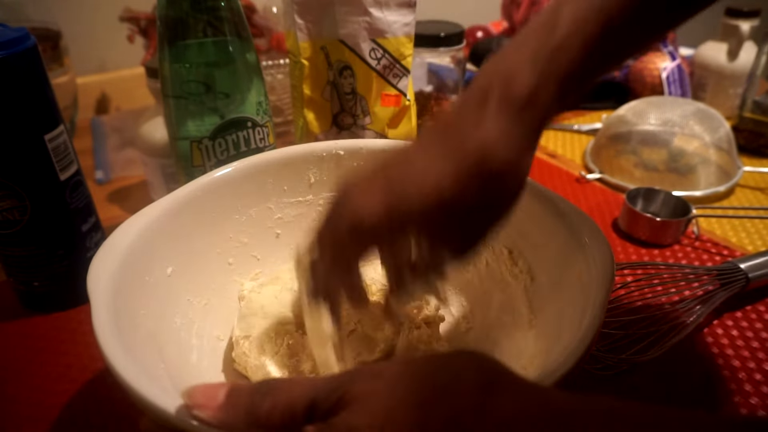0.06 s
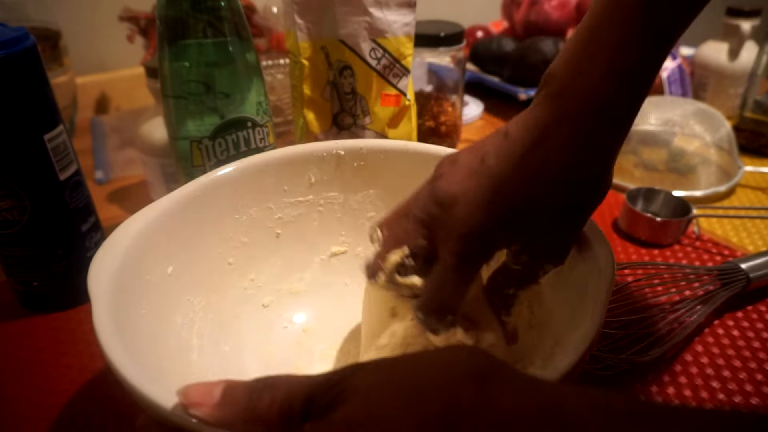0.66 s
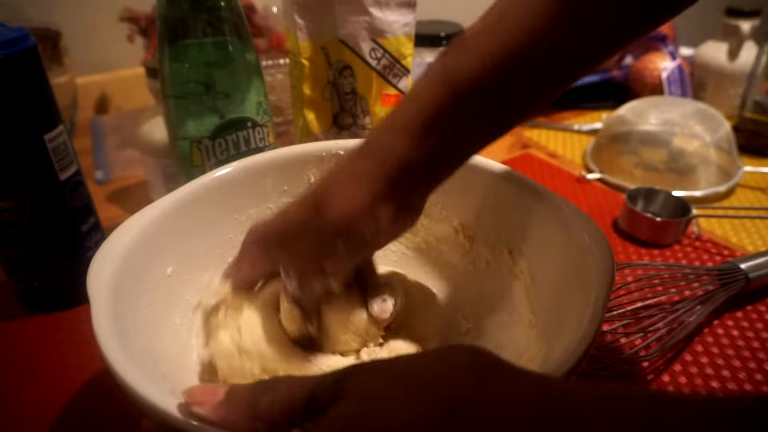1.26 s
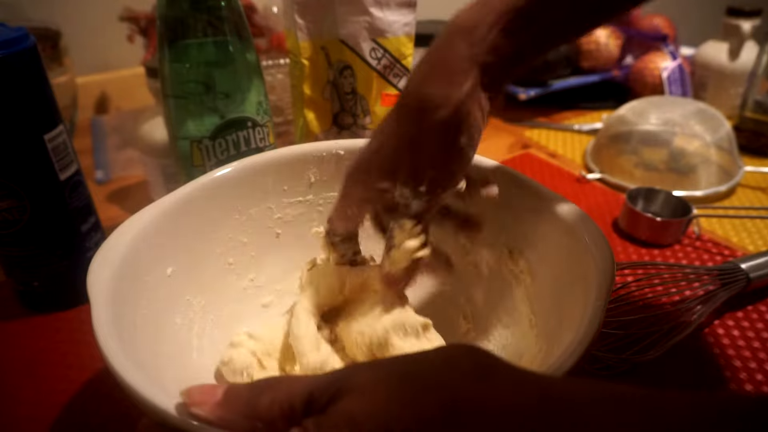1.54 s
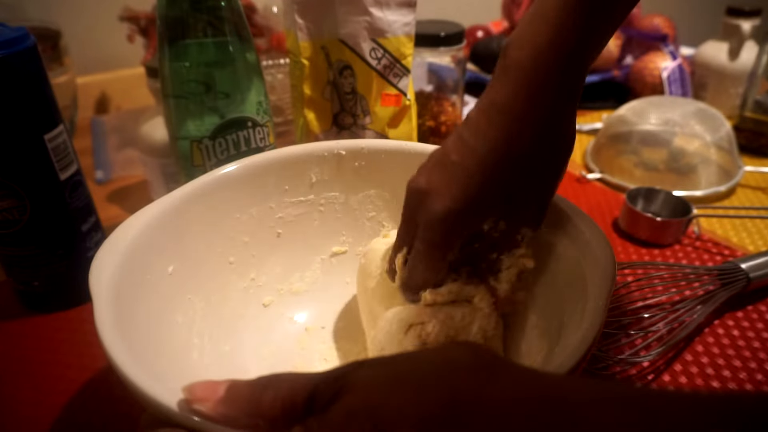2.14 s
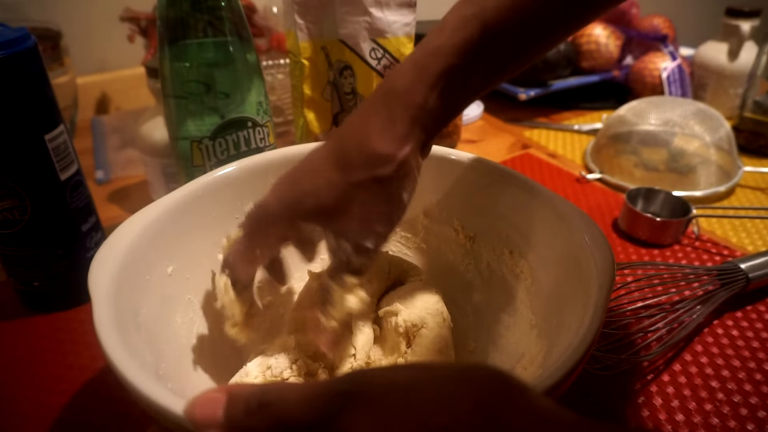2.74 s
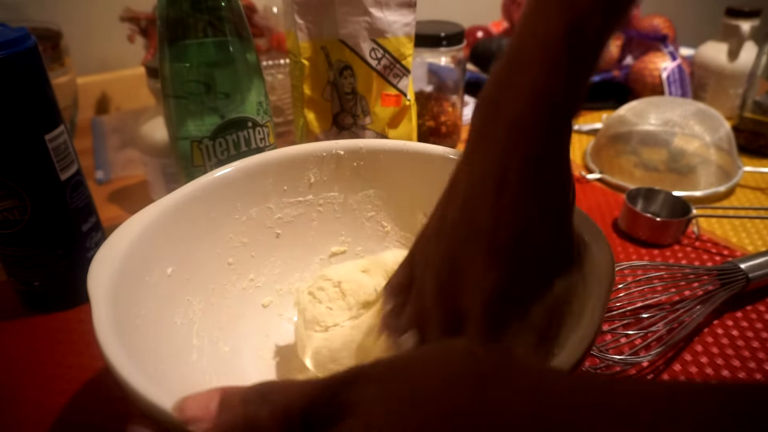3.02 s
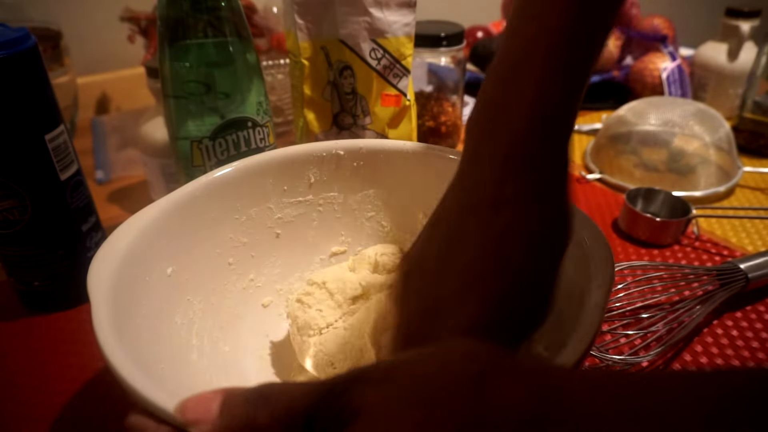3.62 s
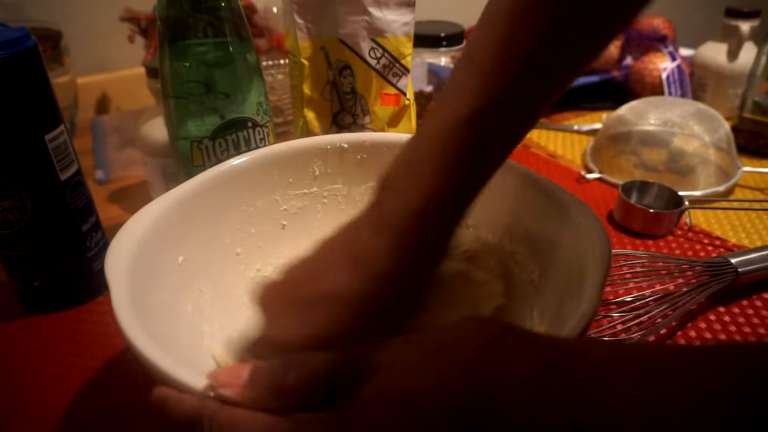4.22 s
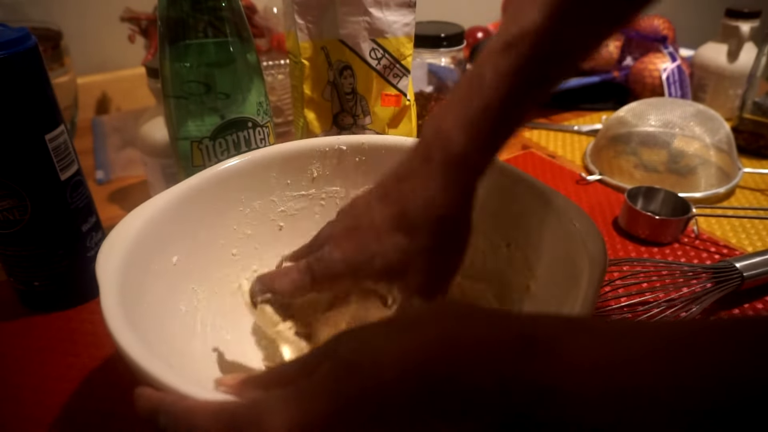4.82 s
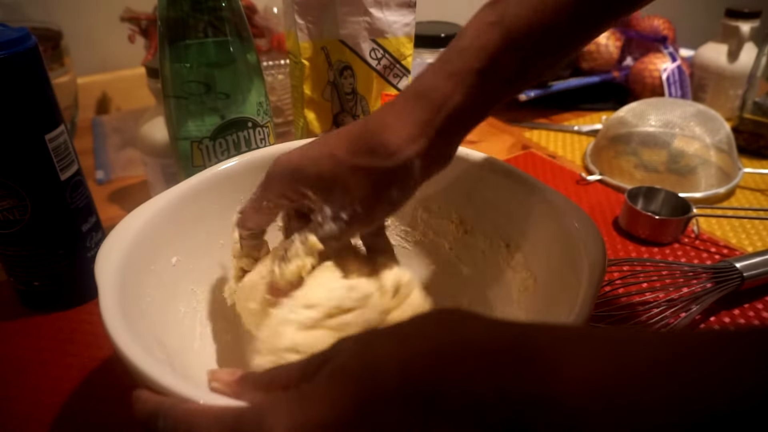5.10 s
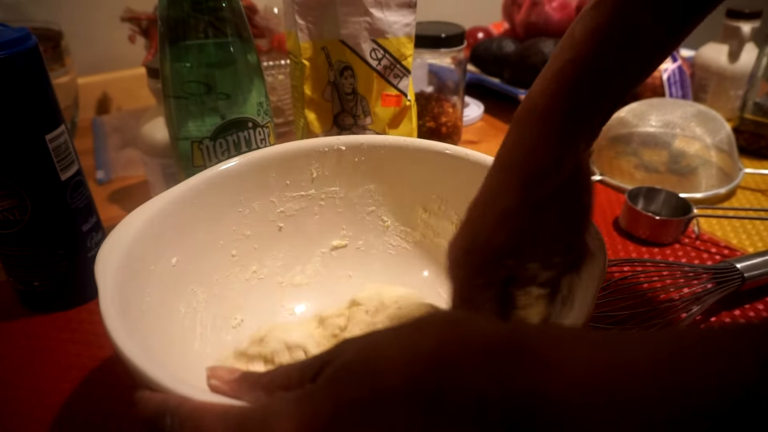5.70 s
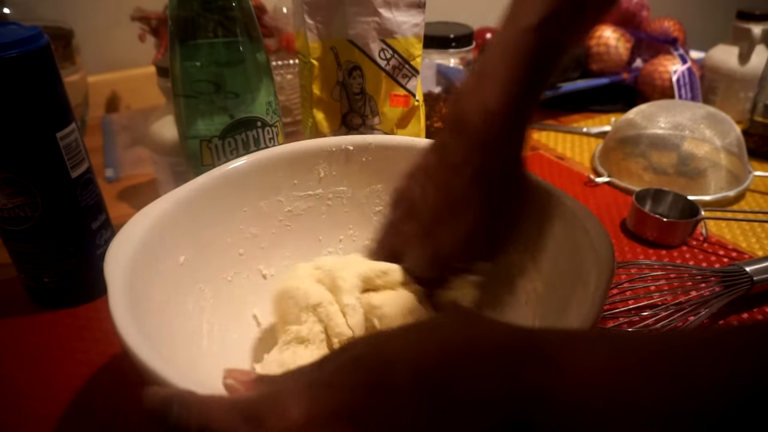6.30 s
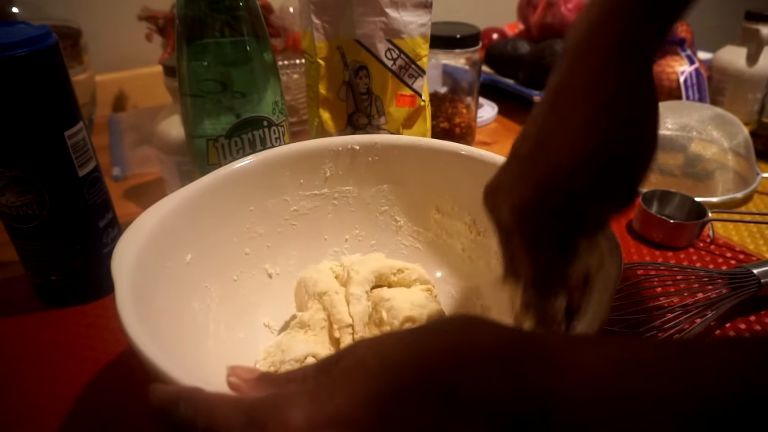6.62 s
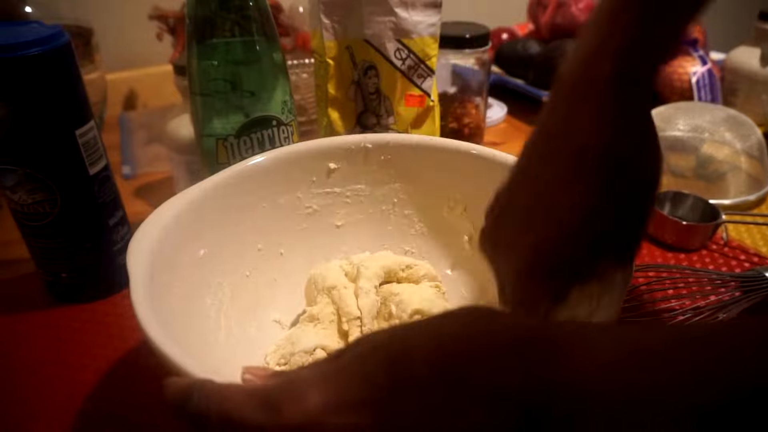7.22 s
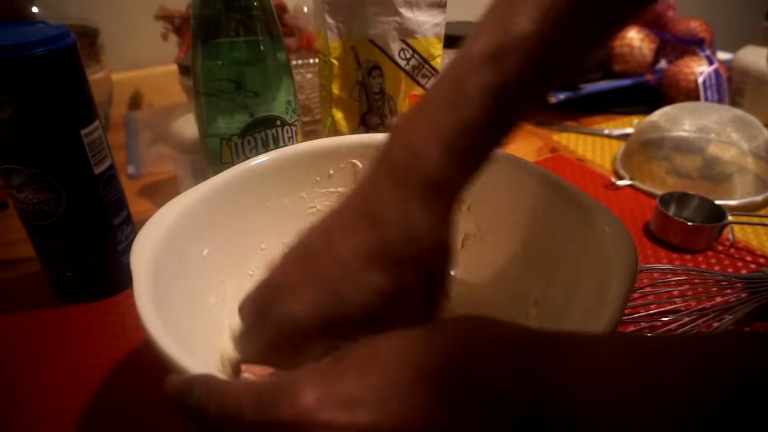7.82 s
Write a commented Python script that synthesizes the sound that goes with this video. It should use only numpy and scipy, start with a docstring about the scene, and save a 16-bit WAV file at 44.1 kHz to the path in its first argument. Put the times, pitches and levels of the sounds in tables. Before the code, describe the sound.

A hand kneads stiff dough in a large mixing bowl on a kitchen table, heard close and slightly to the right. At the very start the bowl knocks on the table, and a bright hiss dies away into a thin, faint whistle within half a second. Further pushes rock the bowl at about 1.1, 2.4, 2.8, 4, 4.9, 5.3, 6.1 and 7.1 seconds. Each gives a hollow knock with a soft low thud and a short ring in the room; the loudest comes near 4 seconds. Between them are lighter bumps, quiet swishes of a floury hand round the bowl wall, dull rustling of dough and scattered sticky ticks. Faint thin squeaks appear around 0.8 and 4.5 seconds. A last few ticks come at about 7.6 seconds. An appliance hums and whines faintly in the background throughout.

```python
"""Kitchen table: a hand kneads stiff dough in a large mixing bowl, the right microphone the nearer of a pair.
The first push knocks the bowl on the table, and a bright hiss dies away into a thin whistle. About once a
second another push rocks the bowl and the knock rings on in the room, loudest near 4 s. Between pushes
the floury hand rubs round the wall, the dough rustles and sticky bits tick, with a last few ticks at
the end. An appliance hums and whines faintly in the background throughout."""
import sys
import numpy as np
from scipy import signal
from scipy.fft import rfft, irfft, next_fast_len
from scipy.io import wavfile

SR = 44100
rng = np.random.default_rng(int(sys.argv[2]) if len(sys.argv) > 2 else 0)


def waveform_to_disk(signal):
    """Save audio, clipped to [-1, 1], as 16-bit WAV at the path in sys.argv[1]."""
    frames = np.transpose(np.atleast_2d(signal))
    scaled = np.clip(frames, -1, 1) * 32767
    samples = np.round(scaled).astype(np.int16)
    wavfile.write(sys.argv[1], SR, samples)


N = 346225

# bowl meets table: (time [s], level [dB], hardness [factor on contact bandwidth],
# weight behind the push [dB], ring that the hands leave undamped [dB])
KNOCKS = [(0.0651, -15.5, 0.93, -20, -.5), (1.0564, -16.5, 0.96, -16, 1), (1.532, -31, 0.92, 3, 2),
          (1.761, -30.5, 0.67, -23, 5), (2.399, -11.5, 1.21, -16, 0), (2.8474, -10.5, 1.205, -10, 1),
          (3.411, -23.5, 0.52, 0, -14), (3.4194, -23, 0.75, -11, 2.5), (4.038, -10.5, 0.52, 3, -15),
          (4.0496, -8.5, 1.096, -2.5, 3), (4.43, -32.5, 0.71, 5, 0), (4.511, -28.5, 0.56, 6.5, 7),
          (4.9466, -15.5, 0.78, -28, -1.5), (5.211, -36.5, 0.83, 4, 5.5), (5.2996, -14.5, 0.6, 0.5, -1),
          (5.3251, -13.5, 0.92, -6.5, -0.5), (6.1436, -15.5, 0.84, -13.5, 0), (7.095, -29, 1.08, 4, -1),
          (7.1061, -12, 0.72, -9, 0), (7.282, -34, 0.65, -2, 8), (7.521, -28.5, 0.73, -19, 2)]
# ring of bowl and table: (frequency [Hz], gain [dB], t60 [s])
BOWL_MODES = [(232.5, -7, 0.19), (249, -43, 0.56), (320, 8.5, 0.36), (341, 12, 0.89), (356, 4, 0.75),
              (437, -9.5, 0.12), (521.5, 1, 0.22), (573, 6, 0.42), (639, -4.5, 0.72), (687, 11.5, 0.45),
              (810, -19, 0.75), (905, 6, 0.8), (1008, -10, 0.46), (1069, 13.5, 0.25), (1214, 11, 0.24),
              (1257, -12, 0.59), (1354, 12, 0.12), (1460, 13.5, 0.23)]
# a knock's short waves favour the nearer microphone: (frequency [Hz], right minus left [dB])
KNOCK_BALANCE = [(280, 0.5), (480, 1.5), (900, 6), (2000, 3.5)]
# the hand sweeps round the wall: (start [s], length [s], level [dB], extra rasp from pressure [dB],
# swell over the stroke [dB])
STROKES = [(0, 0.07, -55.5, 4.5, 2), (0.668, .18, -65, 5, 6), (1.236, 0.25, -70.5, 4, -5),
           (1.522, .04, -57.5, -2.5, -4), (1.847, 0.088, -68, 6, -2), (2.402, .04, -71.5, 11, -1),
           (2.593, 0.063, -66, 4, -4), (2.77, 0.32, -66.5, 12.5, 7), (2.954, 0.15, -48.5, 3.5, 2),
           (3.255, 0.13, -58.5, -2, -11), (3.418, .11, -52.5, 0.5, -2), (3.67, 0.038, -50.5, -2, -1.5),
           (3.745, 0.082, -58.5, -4, 4), (3.888, .14, -52.5, -3.5, 7.5), (4.047, .16, -57, 6, -8.5),
           (4.247, .11, -65.5, 0, -5), (4.389, 0.17, -54, -0.5, -1.5), (4.57, 0.28, -72, 12, 7.5),
           (5.19, 0.13, -68.5, 9, 2), (5.556, 0.2, -61, 0.5, 5.5), (5.875, 0.079, -52, -4.5, -5),
           (5.952, 0.19, -60, 2, -3), (6.291, 0.14, -56.5, -2.5, 3.5), (6.449, 0.082, -51.5, -6.5, -1.5),
           (6.663, .25, -54, -5.5, 2.5), (7.098, .22, -48.5, -6, -7), (7.451, .13, -49, -5, -7.5),
           (7.64, 0.18, -68.5, 4, 1)]
# floury skin on the wall, light and pressed: (frequency [Hz], level [dB])
HISS_SPECTRUM = [(1470, -5), (2500, -9.5), (3310, -18), (3770, -5.5), (4650, -2.5), (6810, -0.5),
                 (9810, -1.5), (12600, -2.5), (16000, -7)]
RASP_SPECTRUM = [(500, 1.5), (800, 4.5), (1400, 5.5), (1800, -1.5), (2500, 1.5), (3500, -3), (5000, -6),
                 (8000, -24.5)]
# the wall rings faintly under the strokes: (frequency [Hz], t60 [s], gain [dB])
WALL_MODES = [(1680, .045, -3), (2010, .04, -5), (2480, .05, -1), (3790, .045, -4), (6980, .035, -3),
              (7440, .05, -3), (7850, .02, -6), (8600, .04, -8), (9640, .022, -2), (12300, .024, -1),
              (13900, .03, -6)]
# rustle of yielding dough: (frequency [Hz], level [dB])
DOUGH_SPECTRUM = [(90, -13), (170, -4.5), (240, 3), (330, -3.5), (520, -1.5), (750, -4), (1100, -31)]
# the loudest sticky bits let go: (time [s], peak [dB], pitch [Hz], t60 [s], band edge [factor on pitch])
TICKS = [(0.165, -40.5, 5500, .02, 1.25), (.293, -50.5, 2200, 0.034, 1.07),
         (1.53, -32.5, 1390, 0.037, 1.02), (2.265, -50.5, 2860, 0.028, 0.85),
         (2.647, -40.5, 2880, 0.011, 1.1), (2.763, -43, 4775, 0.022, 1.1),
         (2.7954, -27.5, 3400, 0.01, 1.13), (4.241, -32.5, 13800, .0094, 1.1),
         (4.3485, -40, 13900, .011, 1), (5.207, -44.5, 2900, 0.047, 1.15), (6.309, -40, 8400, 0.012, 1.7),
         (7.567, -33, 980, 0.021, 1.13), (7.6383, -27, 12800, 0.0079, 1.04),
         (7.753, -41.5, 5900, .012, 1.08)]
# the bright opening hiss: (frequency [Hz], level [dB])
GUSH_SPECTRUM = [(760, -53), (1300, -29), (1680, -36), (1970, -13), (4650, -15), (4950, -14), (5610, -5),
                 (7420, -4.5), (7980, -1.5), (9520, -1), (10800, -11), (11700, -4), (15500, -20)]
# narrow tones that ring in that hiss: (frequency [Hz], t60 [s], gain [dB])
GUSH_TONES = [(2020, 0.13, 3), (4120, .15, 3), (5560, .08, 2), (8100, .06, 0), (11290, 0.11, 15),
              (11800, .12, -3)]
# the thin whistle it leaves: (time [s], pitch [Hz], level [dB])
WHISTLE = [(.12, 8120, -78), (.17, 8150, -67), (.21, 8160, -54), (.26, 7900, -85), (.31, 8260, -56),
           (.36, 8130, -61), (.43, 8150, -93)]
# thin squeaks: (start [s], length [s], pitch [Hz], ring time [s], level [dB])
SQUEAKS = [(.23, .1, 11260, 0.022, -69), (0.256, 0.035, 2440, 0.073, -58.5),
           (0.673, 0.33, 4550, 0.0014, -57.5), (0.842, 0.063, 8850, 0.0018, -55.5),
           (4.464, 0.37, 3410, 0.023, -58), (4.48, 0.33, 4870, 0.013, -65), (4.503, 0.21, 4000, .02, -64),
           (7.637, 0.05, 5400, .005, -54)]
# diffuse answer of the kitchen: (frequency [Hz], gain [dB])
ROOM_SPECTRUM = [(60, 15), (110, -5), (175, -13), (250, 0.5), (450, -3.5), (760, -2), (1150, 6),
                 (1600, 5.5), (2300, 8), (3200, -11), (5000, -20)]
# its decay: (frequency [Hz], t60 [s])
ROOM_T60 = [(100, 0.68), (300, 0.2), (1000, 0.45), (3000, 0.47)]
# the appliance's motor: (frequency [Hz], rms level [dB])
MOTOR_LINES = [(1121, -61.5), (1177, -69), (113.4, -66), (251, -62)]
# its rushing air: (frequency [Hz], level [dB])
AIR_SPECTRUM = [(15, -43), (25, -34), (59, -4.5), (166, -6.5), (236, 1.5), (285, -6), (335, -1), (575, -6),
                (911, -23), (1130, -19.5), (1260, -20.5), (1650, -21), (3520, -29), (11900, -62.5),
                (16000, -46)]
# likeness of diffuse sound at the two microphones: (frequency [Hz], correlation [0..1])
MIC_LIKENESS = [(25, .8), (130, .99), (280, .96), (550, .55), (1100, .35), (2500, .45), (12000, .42)]


def bowl(boom_hz=135.7, boom_t60=0.38, body_hz=101, body_t60=0.043, hollow_hz=172, hollow_t60=0.043):
    """Main source, on the table: each knock booms in the top and rings on in bowl and kitchen."""
    direct, to_table, to_modes = np.zeros((3, N))
    room = np.zeros((2, N))
    for s, level_db, hardness, weight_db, ring_db in KNOCKS:
        knock = from_db(level_db) * rocking(hardness)
        add(direct, s, knock)
        add(to_table, s, knock * from_db(weight_db))
        add(to_modes, s, knock * from_db(ring_db))
        add(room, s, kitchen(knock * from_db(ring_db)))   # the arm has moved, so the echoes are new
    boom = from_db(28.5) * resonate(to_table, boom_hz, boom_t60)
    body = from_db(8) * resonate(direct, body_hz, body_t60)
    ring = 0
    for k, (hz, db, t60) in enumerate(BOWL_MODES):
        strength = from_db(db + 2 * np.tanh(drift(2.04)))   # the dough shifts between pushes
        ring += (-1) ** k * resonate(strength * to_modes, hz, t60)
    sound = direct + boom + body + from_db(1) * ring + room
    sound -= resonate(sound, hollow_hz, hollow_t60)   # antiresonance between table and bowl
    size = next_fast_len(N)
    balance = pan(at_hz(KNOCK_BALANCE, np.fft.rfftfreq(size, 1 / SR)))
    return irfft(rfft(sound, size) * balance, size)[:, :N]


def rocking(hardness, gap_s=0.004815, gap_shrink=0.8625, softening=0.82, touches=4):
    """The bowl rocks to rest in ever quicker, duller touches; a harder push makes them brighter."""
    force, s = np.zeros(SR // 12), 0
    for k in range(touches):
        click = signal.unit_impulse(len(force), int(s * SR))
        bandwidth_hz = 687 * hardness * softening ** k
        force += from_db(30.5 + 0.25 * k) * cut(click, bandwidth_hz, "low", order=4)
        s += gap_s * gap_shrink ** k
    return -cut(force, 195, "high", order=3)   # the bowl radiates little bass


def dough_thuds(hz=90, t60=0.052, swell_s=0.0036):
    """With every knock the soft mass of dough lands in a few heavily damped low swings."""
    out, t = np.zeros(N), np.arange(SR // 3) / SR
    for s, level_db, _, weight_db, _ in KNOCKS:
        pitch = hz * (1 + rng.uniform(-0.16, 0.1))   # the lump has a new shape every time
        swing = np.sin(2 * np.pi * pitch * t) * decay(t, t60) * (1 - np.exp(-t / swell_s))
        peak_db = -31 + 0.35 * (level_db + weight_db)
        add(out, s, from_db(peak_db) * swing / np.abs(swing).max())
    return cut(out, 53, "high", order=3)


def hand(judder_db=1.73, judders_per_s=35, grips_per_s=9):
    """Inside the bowl, right of centre: floury skin grips unevenly, hisses, rasps and rings the wall."""
    hiss_gain, rasp_gain = stroke_gains()
    judder = from_db(judder_db * drift(judders_per_s))
    hiss = judder * from_db(3) * friction(HISS_SPECTRUM, grain_db=0.96, grains_per_s=310) * pan(2.5)
    rasp = judder * from_db(4.5) * friction(RASP_SPECTRUM, grain_db=1.13, grains_per_s=300) * pan(4.2)
    wipe = hiss_gain * hiss + rasp_gain * rasp
    # each mode swells and fades as the hand moves over the wall
    wall = sum(from_db(db + drift(grips_per_s)) * resonate(wipe, hz, t60) for hz, t60, db in WALL_MODES)
    # between strokes the fingers still touch the dough and the wall
    rub = np.hypot(hiss_gain, from_db(-71.5)) * hiss + np.hypot(rasp_gain, from_db(-69.5)) * rasp
    return wall + cupped_hand(rub)


def stroke_gains(attack_s=0.044, release_s=0.053, linger_db=-24, linger_s=0.23):
    """Gains of hiss and rasp: each stroke rises, swells or eases, then fades to a lingering light touch."""
    power, clock = 0, np.arange(0, N, 64) / SR
    for s, length, level_db, pressure_db, swell_db in STROKES:
        t = clock - s
        held = from_db(level_db + swell_db * (np.clip(t / length, 0, 1) - .5))
        rise = (1 + np.tanh(t / attack_s)) / 2
        after = np.maximum(t - length, 0)
        fade = np.maximum(np.exp(-after / release_s), from_db(linger_db) * np.exp(-after / linger_s))
        gain = held * rise * fade
        power += np.array([gain, gain * from_db(pressure_db)]) ** 2
    return [np.interp(np.arange(N) / SR, clock, gain) for gain in np.sqrt(power)]


def cupped_hand(rub, ring_cycles=40, depth=0.28, shifts_per_s=9):
    """The hollow under the hand keeps changing shape, so narrow peaks and dips come and go."""
    return rub + sum(depth * drift(shifts_per_s) * resonate(rub, hz, ring_cycles / hz)
                     for hz in np.geomspace(1800, 11000, 7))


def dough_rustle(resting_db=-57.5, push_db=-40, yield_s=0.76):
    """The dough rustles dully all along, more under pressed strokes and as it yields to a push."""
    _, pressed = stroke_gains()
    t = np.arange(2 * SR) / SR
    power = from_db(resting_db) ** 2 + (from_db(-1) * pressed) ** 2
    for s, level_db, *_ in KNOCKS:
        add(power, s, (from_db(level_db + push_db) * np.exp(-t / yield_s)) ** 2)
    return np.sqrt(power) * friction(DOUGH_SPECTRUM, grain_db=5.0, grains_per_s=85)


def sticky_ticks(crumbs_per_s=2.5, crumb_db=-53.5, crumb_hz=5200, crumb_t60=0.018, min_edge=1.03):
    """Sticky bits let go on the right, each a short pitched crackle; fainter crumbs come by chance."""
    out, t = np.zeros((2, N)), np.arange(SR // 10) / SR
    crumbs = [(when * N / SR, crumb_db, crumb_hz * 2 ** (2 * pitch - 1), crumb_t60, min_edge)
              for when, pitch in rng.random((int(crumbs_per_s * N / SR), 2))]
    for s, peak_db, hz, t60, edge in TICKS + crumbs:
        crackle = rng.standard_normal((2, len(t))) + rng.standard_normal(len(t))   # part reaches both mics
        edge = max(edge, min_edge)
        snap = cut(crackle * decay(t, t60), [hz / edge, hz * edge], "band", order=1)
        add(out, s, from_db(peak_db) * snap / np.abs(snap).max())
    return out * pan(5.3)


def fading_hiss(hold_s=0.0092, fall_db_per_s=232, waver_hz=25):
    """At the start a bright, ringing hiss on the right dies away into a thin, unsteady whistle."""
    out, t = np.zeros((2, N)), np.arange(SR // 2) / SR
    fade_db = -28.5 - fall_db_per_s * np.maximum(t - hold_s, 0)
    gush = from_db(fade_db) * friction(GUSH_SPECTRUM, grain_db=0.9, grains_per_s=400, size=len(t))
    gush += sum(from_db(db) * resonate(gush, hz, t60) for hz, t60, db in GUSH_TONES)
    whistle_hz, whistle_db = in_time(WHISTLE)
    whistle = from_db(whistle_db) * sine(whistle_hz + waver_hz * drift(210))
    add(out, 0, gush * pan(5.1) + whistle[:len(t)])
    return out


def squeaks():
    """Well to the right: narrow, rough tones that swell quickly and fade."""
    out, t = np.zeros((2, N)), np.arange(SR // 2) / SR
    for s, length, hz, t60, level_db in SQUEAKS:
        band = resonate(rng.standard_normal((2, len(t))), hz, t60 / 2)
        tone = rms_one(resonate(band, hz, t60 / 2))
        swell = np.interp(t / length, [0, 1 / 4, 1], [0, 1, 0])
        add(out, s, from_db(level_db) * tone * swell)
    return out * pan(8.1)


def kitchen(knock, first_echo_s=0.0164, build_s=0.0023):
    """The room round the microphones: dense reflections of one knock, dying away octave by octave."""
    t = np.arange(SR // 2) / SR
    white = rfft(rng.standard_normal((2, len(t))))
    hz = np.fft.rfftfreq(len(t), 1 / SR)
    edges, tail = np.append(0, 2. ** np.arange(7, 14)), 0
    for low, high in zip(edges, edges[1:]):
        band = irfft(white * (hz >= low) * (hz < high), len(t))
        fall = np.log(1000) / at_hz(ROOM_T60, (low + high) / 2)
        tail += band * np.exp(-fall * t) * np.sqrt(2 * fall / SR)   # same energy whatever the decay
    onset = np.clip((t - first_echo_s) / build_s, 0, 1)
    return signal.fftconvolve(knock[None], stereo_colour(tail, ROOM_SPECTRUM) * onset, axes=1)


def appliance(waver_hz=1.16, waver_db=0.6, air_db=-51.5, halo_db=-63):
    """In the background: slightly wavering motor lines over rushing air, some ringing round the whine."""
    motor = 0
    for hz, db in MOTOR_LINES:
        amplitude = np.sqrt(2) * from_db(db + waver_db * drift(5.4))
        motor += amplitude * sine(hz + waver_hz * drift(8))
    air = friction(AIR_SPECTRUM, grain_db=1.8, grains_per_s=9.7)
    halo = rms_one(resonate(air, hz=1130, t60=0.015))
    return motor + from_db(air_db) * air * pan(0.88) + from_db(halo_db) * halo


def friction(spectrum, grain_db, grains_per_s, size=N):
    """Stereo noise of countless tiny slips that come in clumps of limited size; rms 1."""
    slips = rng.standard_normal((2, size))
    clumps = from_db(grain_db * np.minimum(drift(grains_per_s)[:size], 1.6))
    return rms_one(stereo_colour(slips * clumps, spectrum))


def stereo_colour(pair, spectrum):
    """Two unrelated signals become left and right, coloured, alike in the bass and apart in the treble."""
    size = next_fast_len(pair.shape[-1])
    hz = np.fft.rfftfreq(size, 1 / SR)
    mid, side = rfft(pair, size) * from_db(at_hz(spectrum, hz))
    alike = at_hz(MIC_LIKENESS, hz)
    mics = np.sqrt((1 + alike) / 2) * mid + np.sqrt((1 - alike) / 2) * side * [[1], [-1]]
    return irfft(mics, size)[:, :pair.shape[-1]]


def from_db(db):
    """Decibels to gain."""
    return 10 ** (np.asarray(db) / 20)


def rms_one(x):
    """Scale to rms 1."""
    return x / np.sqrt(np.mean(x ** 2) + 1e-20)


def decay(t, t60):
    """An envelope that falls 60 dB in t60 seconds."""
    return np.exp(-np.log(1000) * t / t60)


def sine(hz):
    """A tone that follows a pitch given at every sample."""
    return np.sin(2 * np.pi * np.cumsum(hz) / SR)


def drift(per_s):
    """A random wander of rms 1, with per_s turns a second."""
    knots = rng.standard_normal(int(N / SR * per_s) + 2)
    return rms_one(np.interp(np.arange(N) / SR * per_s, np.arange(len(knots)), knots))


def in_time(rows):
    """The columns of a curve at every sample."""
    s, *columns = np.transpose(rows)
    return [np.interp(np.arange(N) / SR, s, column) for column in columns]


def at_hz(points, hz):
    """Read a table on a log-frequency axis."""
    table_hz, values = np.transpose(points)
    return np.interp(np.log(hz + 1e-3), np.log(table_hz), values)


def cut(x, hz, kind, order):
    """Butterworth filter."""
    sos = signal.butter(order, np.clip(hz, 10, .48 * SR), kind, fs=SR, output="sos")
    return signal.sosfilt(sos, x + 1e-18)


def resonate(x, hz, t60):
    """A resonance with gain 1 at its top."""
    r = decay(1 / SR, t60)
    feedback = [1, -2 * r * np.cos(2 * np.pi * hz / SR), r * r]
    return signal.lfilter(np.array([1, 0, -1]) * (1 - r * r) / 2, feedback, x + 1e-18)


def pan(right_db):
    """Gains of the left and right microphones."""
    return from_db(np.array([[-.5], [.5]]) * right_db)


def add(track, s, sound):
    """Mix a sound in at s seconds."""
    at = max(0, int(round(s * SR)))
    track[..., at:at + sound.shape[-1]] += sound[..., :N - at]


def scene():
    """Everything at the microphone pair; the right channel lags by one sample."""
    kneading = bowl() + dough_thuds() + hand() + dough_rustle()
    left, right = kneading + squeaks() + fading_hiss() + appliance() + sticky_ticks()
    return np.array([left, np.append(0, right[:-1])])


def record(dry, cutoff_hz=15750):
    """The top is cut steeply."""
    return signal.sosfilt(signal.ellip(12, .1, 90, cutoff_hz, fs=SR, output="sos"), dry)


dry = scene()
out = record(dry)
waveform_to_disk(out)
```